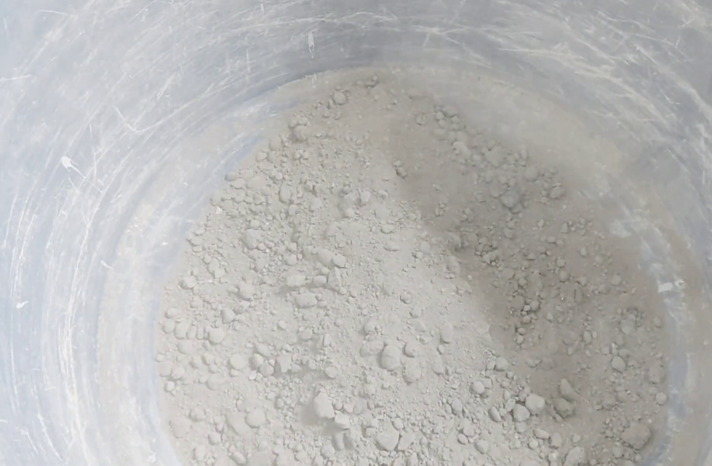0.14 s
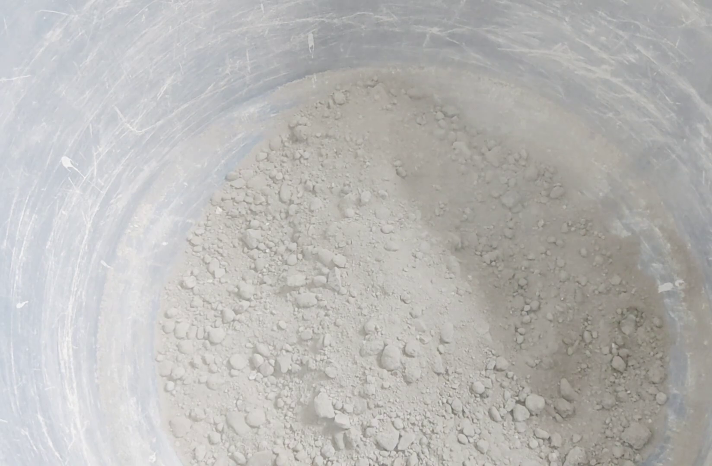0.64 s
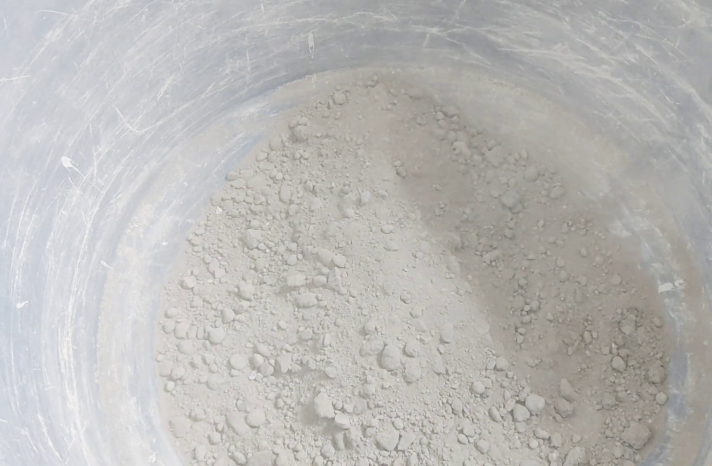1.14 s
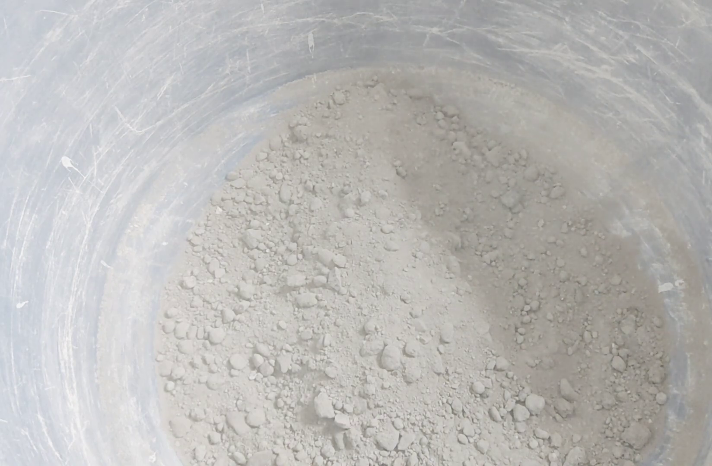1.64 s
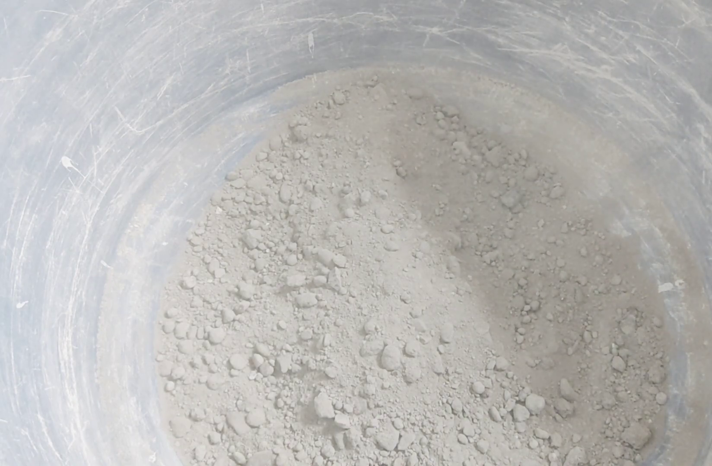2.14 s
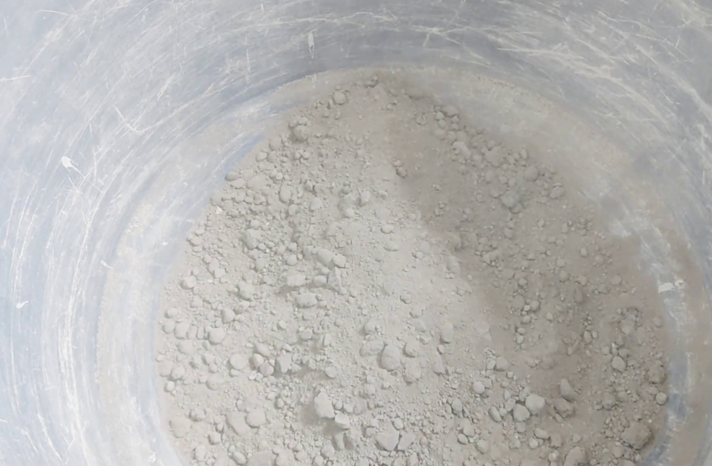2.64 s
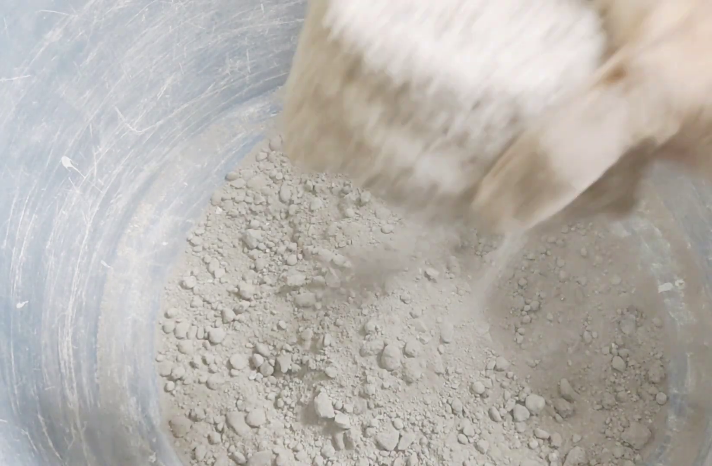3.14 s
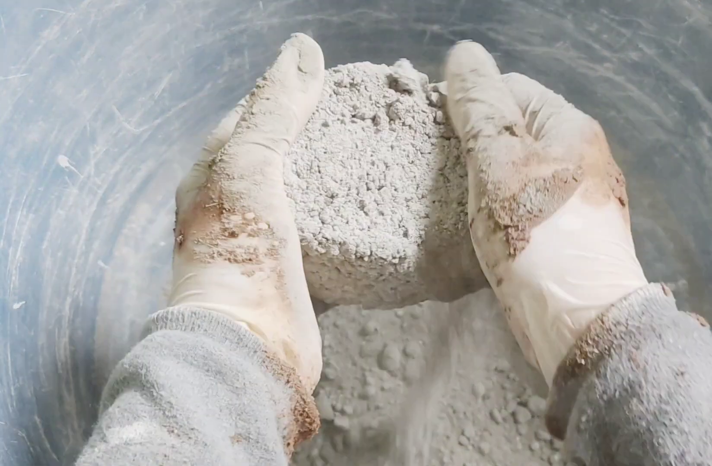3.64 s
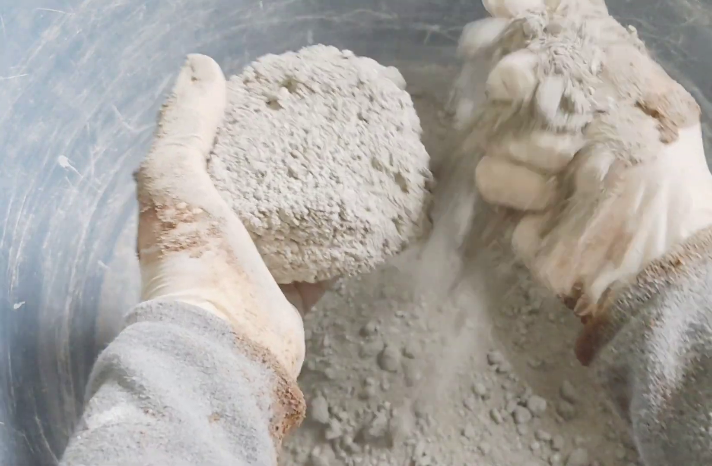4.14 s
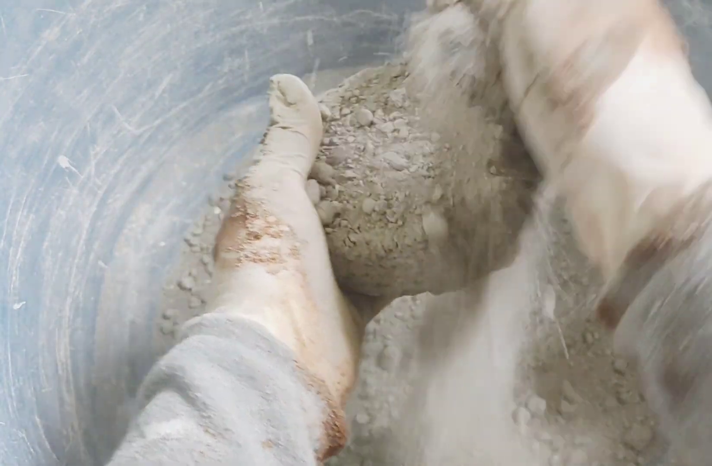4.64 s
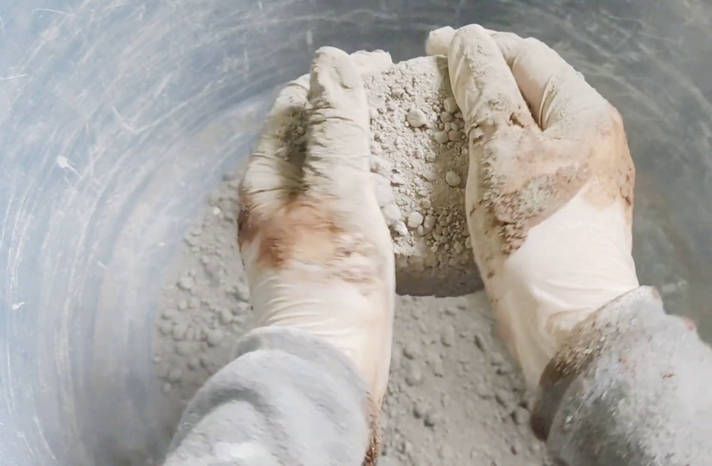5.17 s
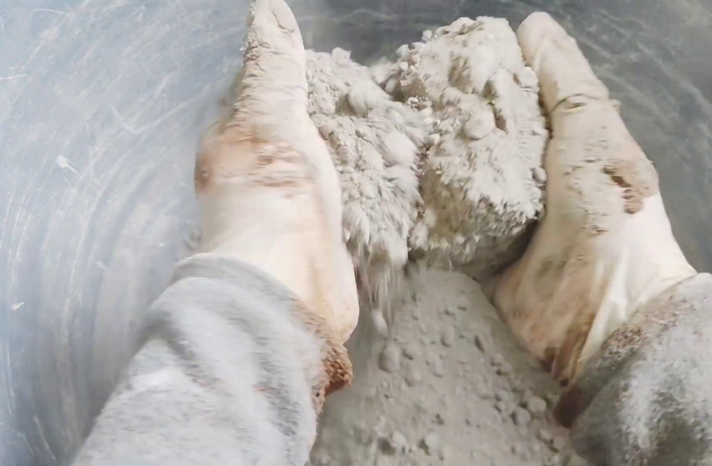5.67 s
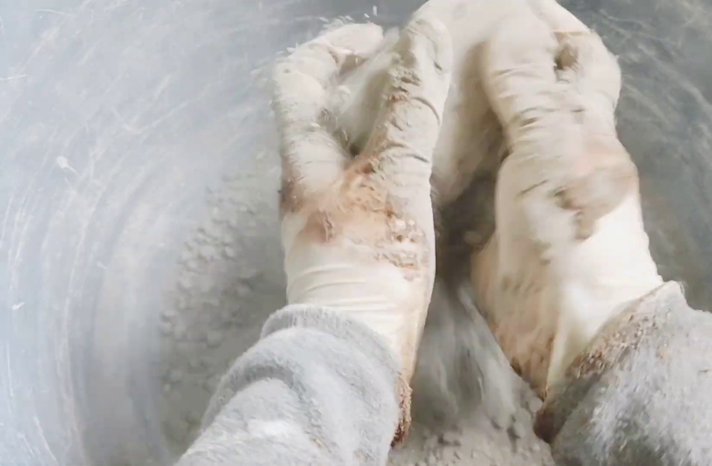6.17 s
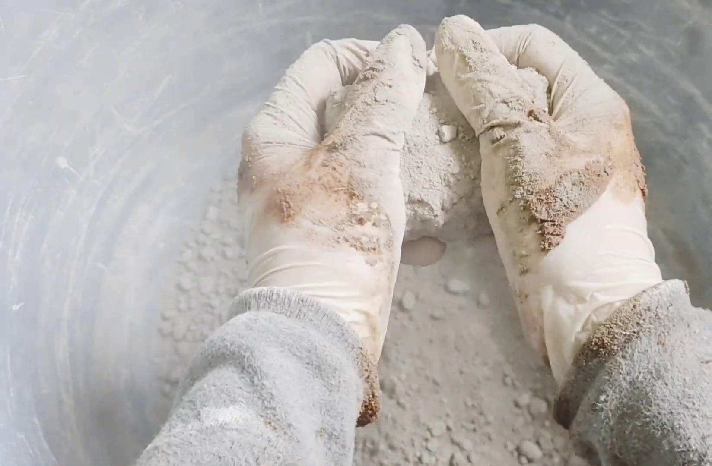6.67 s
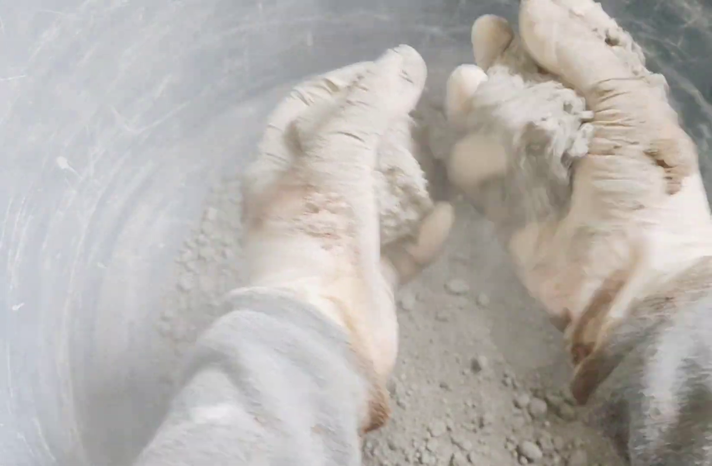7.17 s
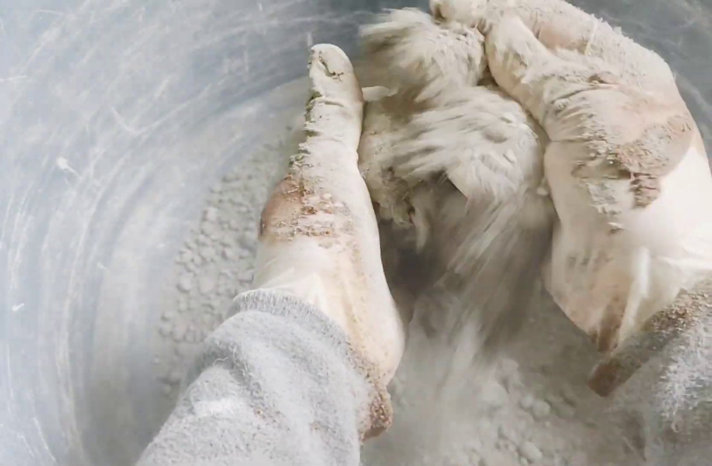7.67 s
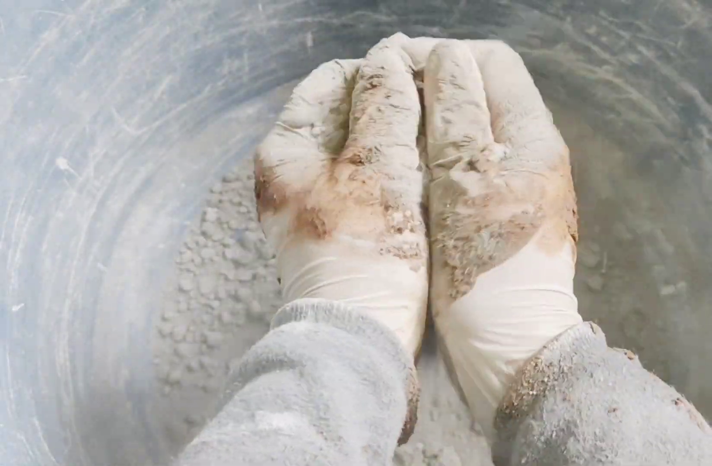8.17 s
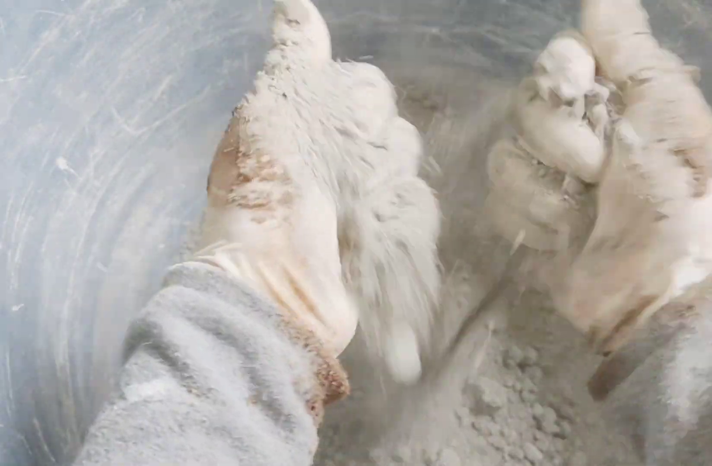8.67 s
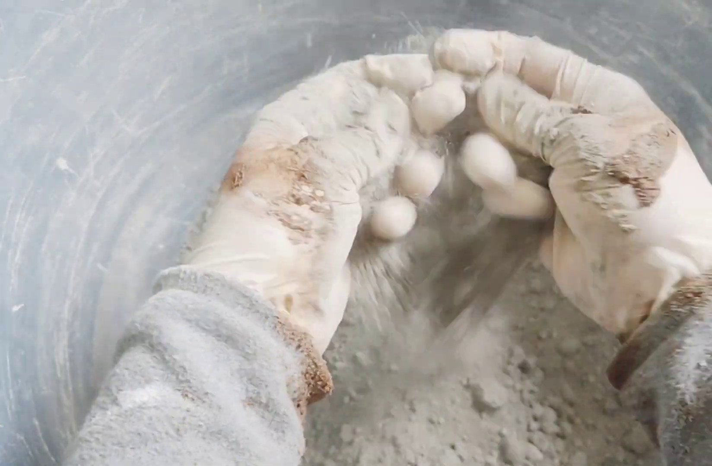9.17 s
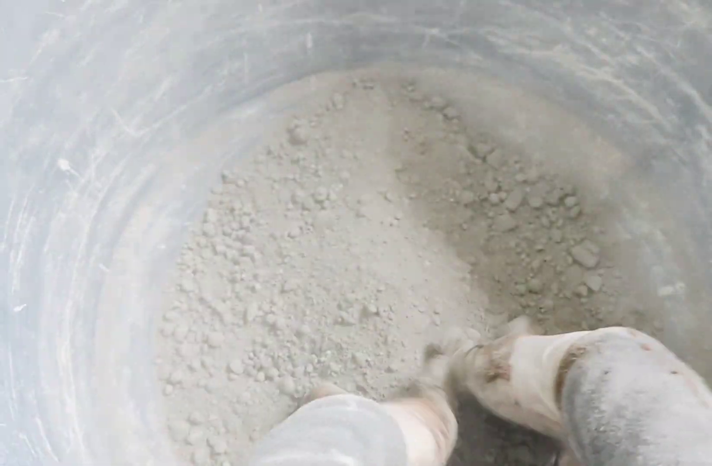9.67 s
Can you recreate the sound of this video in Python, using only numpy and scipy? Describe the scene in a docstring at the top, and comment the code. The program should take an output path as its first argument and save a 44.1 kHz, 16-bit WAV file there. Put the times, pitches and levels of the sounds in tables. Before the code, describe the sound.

Dry sandy lumps break up in gloved hands right at the microphones. A faint granular start gives way to a gritty drag on the left with small knocks. After a near pause, bright cracks and woody, hollow knocks burst out in clusters, each shedding crisp crumbs and hissing grit into the tub; heavier pieces land with low thuds. The breaks keep coming until the end, above a dull low room rumble.

```python
"""Crumbling a dry block

Gloved hands squeeze and crumble a block of dry sand and cement over a plastic tub, heard close up in stereo.
Lumps snap or drop: a short knock of a few cycles, a sharp crack of bright noise, then pattering debris.
In between, crumbs crunch and grit trickles: noise and tiny tones, swelling with each squeeze.
Early on the block is dragged closer, a gritty scrape; a dull rumble of low noise lies under it all."""
import sys
import numpy as np
from scipy import signal
from scipy.fft import rfft, irfft, next_fast_len
from scipy.io import wavfile
from scipy.ndimage import uniform_filter1d, map_coordinates

SR = 44100
rng = np.random.default_rng(int(sys.argv[2]) if len(sys.argv) > 2 else 0)


def store_pcm(level_fs):
    """Save levels as 16-bit WAV."""
    pcm = np.round(np.clip(level_fs, -1, 1) * 32767).astype(np.int16)
    wavfile.write(sys.argv[1], SR, np.atleast_2d(pcm).T)


def volts_from_decibels(level):
    """Turn decibel levels (scalar or array-like) into linear amplitude factors."""
    exponent = np.asarray(level, float) / 20
    return 10 ** exponent


N = 432621  # length in samples

# lumps that snap: t/s, knock level/dB, knock pitch f/Hz, crack level/dB, debris level against the snap/dB
SNAPPING_LUMPS = [(1.234, -33, 1850, -33, -6), (1.378, -31, 1990, -44, -25), (1.401, -22.5, 2100, -44, -31),
                  (1.493, -37.5, 448, -34.5, -0.5), (1.514, -28, 2370, -40, -6.5),
                  (1.592, -33, 476, -30, -12), (1.879, -26.5, 2470, -34, -18), (2.454, -30, 1300, -37, -5),
                  (2.491, -23, 830, -27, -18), (2.526, -23, 950, -36, -8.5), (2.649, -21, 790, -24.5, -14),
                  (2.691, -29, 2940, -25, -7), (4.384, -27.5, 970, -50, -2), (4.396, -19, 1120, -18, -35),
                  (4.404, -15, 1150, -22, -15), (4.425, -18, 720, -46, -8.5),
                  (4.578, -22.5, 1040, -18.5, -11.5), (4.606, -22.5, 1130, -19.5, -22),
                  (4.659, -20, 1300, -24, -11), (4.667, -10, 1230, -6, -19), (4.744, -19, 1710, -25.5, -19),
                  (4.854, -24, 516, -23, -8), (4.874, -4, 1046, -14.5, -19), (4.88, -10, 1005, -13, -34),
                  (5.507, -42, 2500, -39.5, 9.5), (5.62, -32, 1090, -41, -11), (5.632, -21, 1170, -34, -5),
                  (5.636, -16, 1150, -26, -9), (5.643, -15, 1200, -18, -20), (5.647, -18, 1020, -26, -24),
                  (5.653, -28, 1100, -35, -17), (5.6697, 5, 1072, -33, -26), (5.6716, -10, 920, -36, -23),
                  (5.684, -26, 1110, -28, -33), (5.689, -13, 1150, -27, -28), (5.693, -22, 1010, -33, -28),
                  (5.713, -9.5, 1036, -16.5, -51), (5.827, -21, 990, -22.5, -32),
                  (6.033, -1, 896, -10, -13.5), (6.123, -12.5, 1080, -9.5, -36),
                  (6.124, -6.5, 573, -32, -17.5), (6.239, -11, 1125, -18.5, -24),
                  (6.499, -16.5, 1140, -13.5, -22), (6.512, -15.5, 1140, -18.5, -16.5),
                  (6.559, -23, 1090, -22.5, -24), (7.109, -25, 2240, -22.5, -15.5),
                  (7.251, -30, 1530, -31, -11), (7.284, -4, 990, -8, -24), (7.436, -26.5, 2240, -30, -7.5),
                  (7.513, -23, 1100, -36, -23), (7.575, -25, 1540, -29, -13.5), (7.586, -24, 870, -36, -28),
                  (7.687, -13.5, 945, -25, -15), (7.704, -16, 1980, -16, -9),
                  (7.704, -3, 505, -14.5, -13.5), (7.764, -8.5, 1125, -25, -24),
                  (7.765, -11.5, 1780, -30, -17.5), (7.918, -21.5, 1040, -47, -14),
                  (7.963, -17, 1830, -25, -14), (8.007, -26, 1120, -27, -19),
                  (8.059, 1.5, 1200, -14.5, -16), (8.147, -14, 1320, -9, -16.5),
                  (8.151, -7, 1040, -7, -12.5), (8.17, -16, 1110, -26, -28), (8.21, -17, 1045, -30, -30),
                  (8.43, -28.5, 1170, -28, -14.5), (8.631, -19.5, 670, -19, -19),
                  (8.673, -12.5, 1216, -35, -22), (8.737, -27, 1110, -22.5, -13),
                  (8.785, -16.5, 547, -28, -22), (8.904, -19.5, 1040, -26, -16),
                  (8.982, -21, 960, -20.5, -12.5), (9.175, -12.5, 1040, -18.5, -21),
                  (9.197, -11, 1240, -25, -18.5), (9.311, -15.5, 1200, -38, -11),
                  (9.3221, 0.5, 1940, -11, -19.5), (9.325, -2.5, 726, -34, -28), (9.524, -7, 1125, -9, -17),
                  (9.564, -8, 1120, -13.5, -7), (9.574, -8, 830, -6.5, -41), (9.712, -28, 590, -23, -6.5),
                  (9.8, -23.5, 900, -49, -3.5)]
# heavy lumps landing on the tub floor: t/s, level/dB, pitch f/Hz, length/cycles
FLOOR_THUDS = [(2.455, -23, 500, 3.2), (2.49, -22, 384, 2.9), (2.526, -25, 376, 2.4), (2.55, -29, 430, 2.4),
               (2.648, -28, 362, 2), (2.673, -26.5, 410, 3.1), (3.686, -29, 420, 3.3),
               (5.675, -15, 235, 2.7), (6.031, -6, 274, 1.76), (7.693, -19, 330, 1.5),
               (7.7029, 6, 308, 2.05), (7.706, -11, 194, 3.1), (7.737, -7.5, 466, 2.3),
               (7.762, -15.5, 255, 4), (7.783, -19, 270, 2.3), (7.81, -17, 350, 2), (8.597, -19, 368, 2.1),
               (8.783, -21, 440, 2.4)]
# single hard grains that click without a knock: t/s, crack level/dB
GRAIN_CLICKS = [(0.203, -25), (0.347, -32), (0.361, -29), (0.585, -30), (0.604, -30), (0.667, -22.5),
                (0.77, -25), (1.074, -31), (1.166, -29), (1.502, -25), (1.866, -34), (2.809, -22),
                (2.889, -26), (3.18, -24.5), (3.239, -23), (3.297, -28), (4.297, -23), (4.636, -28),
                (4.716, -13), (4.748, -23), (4.766, -28), (4.776, -28), (5.583, -33), (5.788, -22.5),
                (6.186, -28), (6.199, -24), (6.277, -28), (6.394, -13.5), (6.675, -25), (7.89, -24),
                (8.935, -20), (9.024, -21), (9.039, -19.5), (9.107, -28), (9.158, -29), (9.203, -18.5),
                (9.229, -20), (9.691, -23)]
# powder falling from the hands, slowly rising and sinking in level:
# t/s, crunch of crumbs level/dB, trickle of fine grit level/dB
POWDER_FLOW = [(0.0, -59.5, -48), (1.2, -57.5, -48.5), (1.42, -53, -43), (2.4, -50, -51),
               (2.59, -45, -35.5), (2.73, -58, -62), (3.19, -56, -46), (3.85, -57, -47), (4.78, -42, -37),
               (5.03, -51.5, -47.5), (5.2, -66, -56), (5.4, -51.5, -46.5), (5.68, -41.5, -39),
               (6.09, -41.5, -37), (6.39, -52, -38), (6.75, -58, -49), (7.1, -57, -41.5),
               (7.46, -42.5, -42.5), (8.17, -52, -42), (8.44, -50.5, -42), (8.91, -44.5, -38.5),
               (9.4, -46, -37.5), (9.81, -57, -50.5)]
# squeezes and rubs that shed a rush of powder: t/s of the peak, crumbs level/dB, grit level/dB, length/s
POWDER_SQUEEZES = [(0.0, -44, -39, 0.021), (0.22, -73, -39, 0.091), (0.68, -63, -44, 0.036),
                   (0.938, -45, -44, 0.038), (1.296, -46, -43.5, 0.084), (2.012, -40, -40, 0.11),
                   (2.702, -52, -35.5, 0.08), (2.908, -73, -37.5, 0.089), (3.412, -72, -44, 0.05),
                   (3.844, -42.5, -39, 0.03), (4.243, -46.5, -41, 0.37), (4.687, -43, -36, 0.062),
                   (4.871, -30.5, -29, 0.032), (5.304, -49, -46, 0.04), (5.67, -33, -29.5, 0.033),
                   (6.087, -28, -29, 0.032), (6.15, -35, -54, 0.14), (6.52, -45, -39.5, 0.11),
                   (7.273, -48, -36.5, 0.046), (7.53, -37, -36.5, 0.056), (7.707, -53, -37, 0.066),
                   (7.865, -46.5, -38, 0.056), (8.184, -36, -47, 0.1), (8.668, -32.5, -35, 0.076),
                   (8.987, -41, -35.5, 0.11), (9.341, -34, -26.5, 0.027), (9.703, -26.5, -38, 0.054)]
# where the hands work: t/s, left against right level/dB
HAND_PLACE = [(0, 3.5), (0.2, -7), (0.55, 1.5), (1.4, 1.5), (2.6, 2.5), (3.2, -2), (4.0, -1.5), (4.9, -0.5),
              (5.5, -1.5), (6.2, 0), (6.5, -1.5), (7.0, 0), (7.45, -1), (8.1, 0), (9.2, -1), (9.81, -0.5)]
# the block being dragged closer along a surface to the left: t/s, level/dB
DRAG_LEVEL = [(0.75, -56), (0.8, -47.5), (0.87, -66), (0.95, -48.5), (1.05, -56), (1.2, -51), (1.26, -44),
              (1.4, -40), (1.45, -41.5), (1.64, -45), (2.08, -47.5), (2.24, -48.5), (2.42, -48),
              (2.59, -44), (2.76, -60), (2.85, -69)]
# a glove brushing past: t/s, level/dB, centre f/Hz, length/s
GLOVE_SWISHES = [(0.72, -49.5, 4200, 0.044), (0.99, -46.5, 5100, 0.071)]
# tone colour of crumbs on the tub: f/Hz, relative level per Hz/dB
CRUMB_COLOUR = [(190, -13.5), (330, 2.5), (508, -13), (699, -3.5), (1110, -1), (1590, -3), (2710, -5),
                (5000, -18), (6500, -10), (11000, -120)]
# tone colour of the dull body of a blow on the tub: f/Hz, relative level per Hz/dB
WALL_COLOUR = [(250, -23), (600, -5), (1100, 3.5), (2200, -7), (3800, -11), (6000, -17), (11000, -70)]
# tone colour of fine grit through the microphone port: f/Hz, relative level per Hz/dB
GRIT_COLOUR = [(1470, -20.5), (2500, -11.5), (2750, -14), (3530, -14.5), (4750, -10.5), (5830, -8.5),
               (6600, -4), (7600, 1), (8620, -7), (9700, -19.5), (14100, -31.5), (15800, -32), (16500, -90)]
# tone colour of the surface the block is dragged along: f/Hz, relative level per Hz/dB
SURFACE_COLOUR = [(240, -38), (400, -3.5), (463, -2), (798, -16), (890, -0.5), (960, 5), (1040, 5.5),
                  (1090, -9), (1330, -10), (1580, -8.5), (2340, -6.5), (3250, -16.5), (4570, -10),
                  (5060, -18), (6000, -10.5), (7800, -22), (13200, -120)]
# tone colour of the room rumble: f/Hz, relative level per Hz/dB
ROOM_COLOUR = [(12, -36), (20, -4), (38, -9), (79, -1), (118, -11.5), (168, -6.5), (250, -3), (280, -8),
               (382, -5), (466, -16.5), (793, -19.5), (1030, -22.5), (1840, -32.5), (4000, -29.5),
               (5200, -50), (8800, -120)]
# how alike left and right are: f/Hz, likeness (1 = the same, 0 = unrelated)
LEFT_RIGHT_LIKENESS = [(30, 0.65), (120, 0.81), (240, 0.98), (480, 0.58), (950, 0.23), (1890, 0.015),
                       (3770, 0.0082), (7520, 0.74), (15000, 0.73)]
# how the two microphones differ: f/Hz, left against right level/dB
MICROPHONE_TILT = [(60, 3.5), (180, 5.5), (550, 4), (1650, 1), (4970, -0.5), (15000, -4.5)]


def lumps():
    """A blow rings the tub wall, the break cracks brightly, then debris patters and dies away."""
    knocks = np.zeros((2, N + SR))
    low, high, spill, hard = np.zeros((4, N))  # one kick per event
    for s, knock_db, hz, crack_db, debris_db in SNAPPING_LUMPS:
        at = round(s * SR)
        cycles = 4.02 * (hz / 1000) ** 0.41
        knocks[:, at:at + SR // 4] += volts_from_decibels(knock_db) * knock(hz, cycles, debris_db, rattle_s=0.021)
        low[at], high[at], spill[at] = volts_from_decibels(knock_db), volts_from_decibels(crack_db), volts_from_decibels(debris_db)
    for s, crack_db in GRAIN_CLICKS:
        hard[round(s * SR)] = volts_from_decibels(crack_db)
    for s, db, hz, cycles in FLOOR_THUDS:
        at = round(s * SR)
        knocks[:, at:at + SR // 4] += volts_from_decibels(db) * knock(hz, cycles, rattle_db=-18.0, rattle_s=0.031)
    patter = 0.66 + 0.63 * unit(fading(spikes(rate=370, spread_db=2.0), t60=0.015))

    body = noise(WALL_COLOUR, 0.26 * fading(low, t60=0.032))
    body = body + noise(CRUMB_COLOUR, 0.36 * patter * shower(low * spill, t60=0.3))
    taps = crumbs(rate=350, centre_hz=1080, octaves=0.595, cycles=5.7, spread_db=14.0)
    body = body + 0.22 * shower(low * spill, t60=0.36) * taps

    # run backwards: the lump yields a moment before it snaps
    creak = 0.12 * fading(high[::-1], t60=0.005)[::-1]
    sharp = 0.63 * uniform_filter1d(fading(high, t60=0.0055), size=15, origin=7)
    tail = 0.24 * fading(high, t60=0.027)
    debris = 1.13 * patter * shower(high * spill, t60=0.25)
    crack = noise(GRIT_COLOUR, creak + sharp + tail + debris)
    dust = volts_from_decibels(-16) * fading(hard, t60=0.06)
    crack = crack + noise(GRIT_COLOUR, 0.66 * fading(hard, t60=0.0058) + dust)

    # one clean tick at the break, two samples later on the second channel
    ticks = 4.2 * high + 4.4 * hard
    snap = filtered(np.array([ticks, np.roll(ticks, 2)]), lambda hz: unit(volts_from_decibels(along(GRIT_COLOUR, hz))))
    return placed(knocks[:, :N] + body + crack + snap, *curves(HAND_PLACE))


def knock(hz, cycles, rattle_db, rattle_s):
    """A few strong cycles whose pitch sags, with a rough rattle near that pitch; two quarter-turn versions."""
    t = np.arange(SR // 4) / SR
    turns = hz * (t + 0.00054 * (1 - np.exp(-t / 0.00086)))  # stiff first contact, then softer
    swell = (1 - np.exp(-turns / 1.6)) * np.exp(-(turns / cycles) ** 1.96)
    phase = 2 * np.pi * (turns + np.array([[0], [rng.choice([-.25, .25])]]))
    # a second mode of the tub wall
    partner = 0.4 * np.sin(rng.uniform(1.39, 2.21) * phase + 2 * np.pi * rng.random())
    band = signal.butter(2, [hz / 1.46, hz * 1.255], "bandpass", fs=SR)
    rattle = unit(signal.lfilter(*band, rng.standard_normal((2, len(t)))))
    rattle = rattle * (1 - np.exp(-turns / 0.38)) * np.exp(-t / rattle_s)
    tone = [[1], [.55]] * swell * (np.sin(phase) + partner)
    return tone + volts_from_decibels(rattle_db) * rattle


def shower(kicks, t60):
    """Debris needs a moment to fall: it swells, then dies away."""
    return fading(kicks, t60) - 0.45 * fading(kicks, t60=0.098)


def powder():
    """Crumbs crunch and grit trickles: many small impacts, in clumps that both share."""
    crunch_db, trickle_db = handling()
    clumps_db = 0.5 * wobble(39) + 1.4 * wobble(45)
    bursts = unit(fading(spikes(rate=99, spread_db=7.5), t60=0.066))
    crunch = noise(CRUMB_COLOUR, 0.71 + 0.2 * bursts)
    crunch = crunch + 0.63 * crumbs(rate=250, centre_hz=1405, octaves=1.4, cycles=0.85, spread_db=10.5)
    ticks = unit(fading(spikes(rate=200, spread_db=9.5), t60=0.0097))
    trickle = noise(GRIT_COLOUR, 1.0 + 0.13 * bursts + 0.37 * ticks)
    trickle = trickle + 0.13 * crumbs(rate=160, centre_hz=3700, octaves=1.13, cycles=2.0, spread_db=1.0)
    mix = volts_from_decibels(crunch_db + clumps_db) * unit(crunch)
    mix = mix + volts_from_decibels(trickle_db + clumps_db + 0.93 * wobble(29)) * unit(trickle)
    return placed(patchy(mix, depth_db=2.0), *curves(HAND_PLACE))


def handling():
    """Levels of crumbs and grit in dB: the slow flow plus a quick swell for each squeeze."""
    t = np.arange(N) / SR
    power = volts_from_decibels(np.array(curves(POWDER_FLOW))) ** 2
    rise_share, roundness = 0.5, 2.26  # rise time over fall time; how round the top is
    for s, crumbs_db, grit_db, length in POWDER_SQUEEZES:
        near = slice(max(0, round((s - .5) * SR)), round((s + .5) * SR))
        u = (t[near] - s) / length
        swell = np.exp(-np.abs(np.where(u < 0, u / rise_share, u)) ** roundness)
        power[:, near] += volts_from_decibels([[crumbs_db], [grit_db]]) ** 2 * swell
    return 10 * np.log10(power)


def crumbs(rate, centre_hz, octaves, cycles, spread_db):
    """Small crumbs tap the tub, rate a second: damped tones of a few cycles at scattered pitch."""
    draw = rng.random((int(rate * N / SR), 4))
    start = (draw[:, :1] * N).astype(int)
    hz = centre_hz * 2 ** (octaves * (draw[:, 1:2] + draw[:, 2:3] - 1))
    size = volts_from_decibels(-spread_db * np.log(draw[:, 3:] + .16))
    k = np.arange(600)
    phase = 2 * np.pi * hz * k / SR
    body = size * np.exp(-phase / (2 * np.pi * cycles))
    where = (start + k).ravel()
    # sine and cosine make two versions of the same taps
    pair = [np.bincount(where, (body * wave(phase)).ravel(), N + 600)[:N] for wave in (np.sin, np.cos)]
    return unit(np.array(pair))


def drag():
    """A gritty scrape through the resonances of the surface; it reaches the left microphone first."""
    s, db = np.transpose(DRAG_LEVEL)
    level_db = np.interp(np.arange(N) / SR, s, db, left=-120, right=-120)
    level = volts_from_decibels(level_db + 2.2 * wobble(30))
    catches = unit(fading(spikes(rate=81, spread_db=6.5), t60=0.016))
    near, other = level * unit(noise(SURFACE_COLOUR, 0.58 + 0.41 * catches))
    late = np.pad(near, (19, 0))[:N]  # 19 samples later on the right
    return np.array([volts_from_decibels(4.5) * near, volts_from_decibels(3.5) * (0.64 * late + 0.5 * other)])


def swishes():
    """A glove brushes past: narrow bands of noise that swell and fade."""
    t = np.arange(N) / SR
    total = np.zeros((2, N))
    for s, db, hz, length in GLOVE_SWISHES:
        band = noise([(hz / 1.8, -40), (hz, 0), (hz * 1.5, -40)])
        total += volts_from_decibels(db) * np.exp(-((t - s) / length) ** 2) * band
    return total


def room():
    """Low rumble: coloured noise whose level drifts a little around -44 dB."""
    drift_db = 1.1 * wobble(2.5) + 0.9 * wobble(11)
    return placed(volts_from_decibels(-44 + drift_db) * patchy(noise(ROOM_COLOUR), depth_db=1.5), 0)


def unit(x):
    """Scaled to rms 1."""
    return x / np.sqrt(np.mean(x ** 2) + 1e-20)


def along(points, hz):
    """Reads a curve of (f/Hz, value) points on a log frequency axis."""
    f, v = np.transpose(points)
    return np.interp(np.log(hz + 1), np.log(f + 1), v)


def curves(rows):
    """One value per sample for each column after the time."""
    s, *cols = np.transpose(rows)
    return [np.interp(np.arange(N) / SR, s, c) for c in cols]


def filtered(x, response):
    """x times a response of frequency."""
    m = next_fast_len(N + 8192)
    return irfft(rfft(x, m) * response(np.fft.rfftfreq(m, 1 / SR)), m)[..., :N]


def noise(spectrum, gate=1):
    """Two unrelated noises, gated first and coloured after; without a gate their rms is about 1."""
    return filtered(gate * rng.standard_normal((2, N)), lambda hz: unit(volts_from_decibels(along(spectrum, hz))))


def wobble(rate):
    """A smooth random curve, rate knots a second."""
    return map_coordinates(rng.standard_normal(int(N * rate / SR) + 4), [np.arange(N) * rate / SR])


def spikes(rate, spread_db):
    """Random impacts, rate a second on average, a few stronger than the rest."""
    when, size = rng.random((2, N))
    return (when < rate / SR) * volts_from_decibels(-spread_db * np.log(size + .03))


def fading(kicks, t60):
    """Every kick starts an exponential decay that drops 60 dB in t60 seconds."""
    return signal.lfilter([1], [1, -volts_from_decibels(-60 / (t60 * SR))], kicks)


def patchy(pair, depth_db):
    """A smoothed random field over time and frequency makes patches of the spectrum swell and fade."""
    z = signal.stft(pair, nperseg=512)[2]
    field = uniform_filter1d(rng.standard_normal(z.shape[1:]), size=7, axis=0)
    field = uniform_filter1d(field, size=7, axis=1)
    return signal.istft(z * volts_from_decibels(depth_db * unit(field)), nperseg=512)[1][:, :N]


def placed(pair, pan_db):
    """Two unrelated versions become left and right; bass and top are largely shared, the middle differs."""
    turn = lambda hz: np.arccos(np.clip(along(LEFT_RIGHT_LIKENESS, hz), -1, 1)) / 2
    mid, side = filtered(pair, lambda hz: np.array([np.cos(turn(hz)), np.sin(turn(hz))]))
    return np.array([(mid + side) * volts_from_decibels(pan_db / 2), (mid - side) * volts_from_decibels(-pan_db / 2)])


def scene():
    """Everything in and around the tub."""
    return lumps() + powder() + drag() + swishes() + room()


def roll_off(x):
    """The treble ends steeply here."""
    return signal.sosfilt(signal.butter(12, 16410, fs=SR, output="sos"), x)


def record(dry):
    """The left microphone hears more bass, the right more treble; peaks clip softly."""
    x = filtered(dry, lambda hz: volts_from_decibels(np.array([[.5], [-.5]]) * along(MICROPHONE_TILT, hz)))
    x = x / (1 + np.abs(x / .98) ** 12) ** (1 / 12)
    return roll_off(x)


dry = scene()
out = record(dry)
store_pcm(out)
```